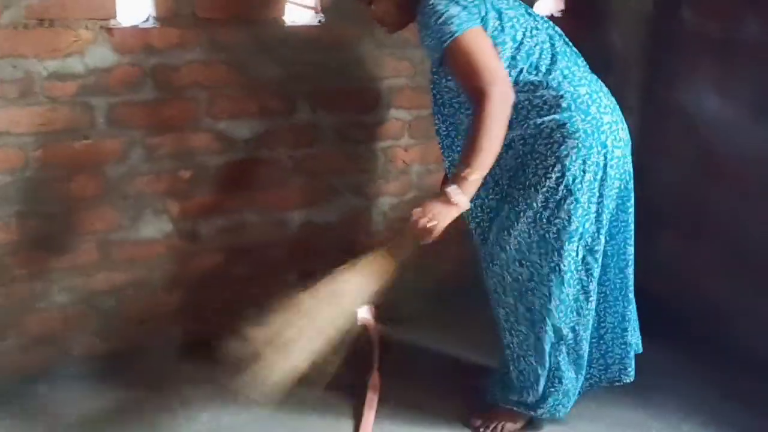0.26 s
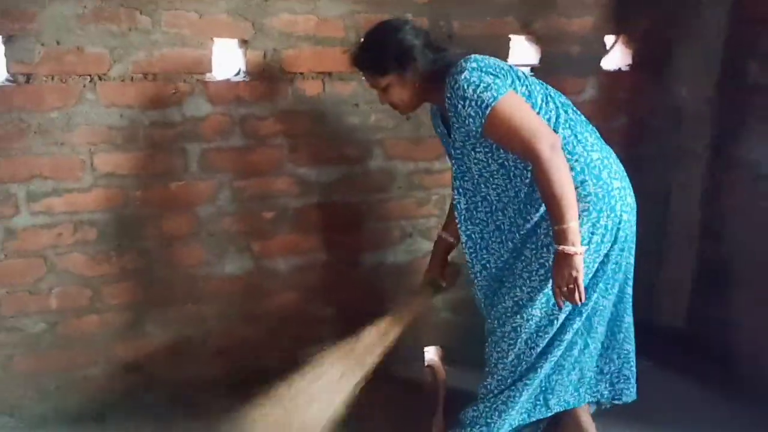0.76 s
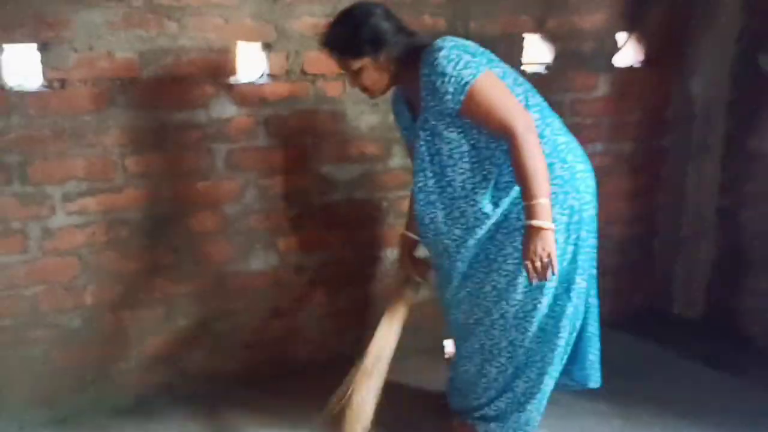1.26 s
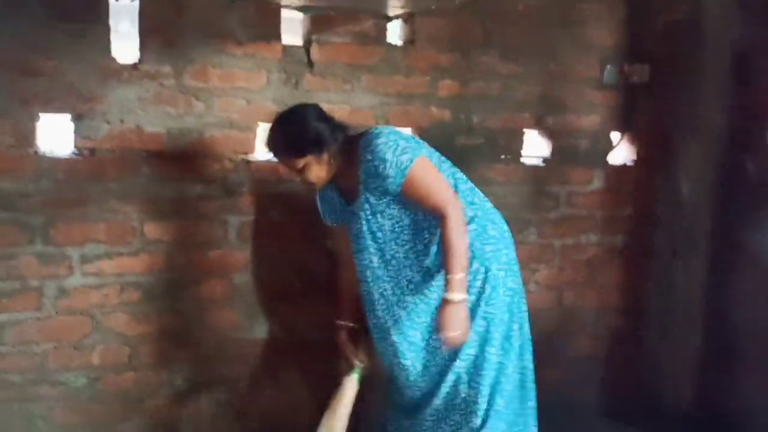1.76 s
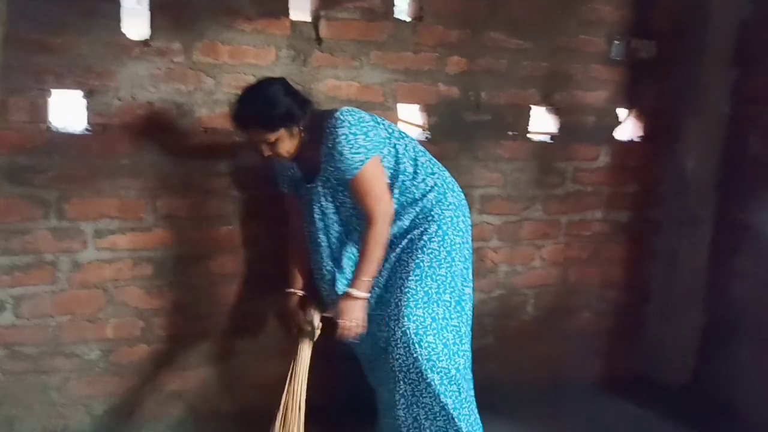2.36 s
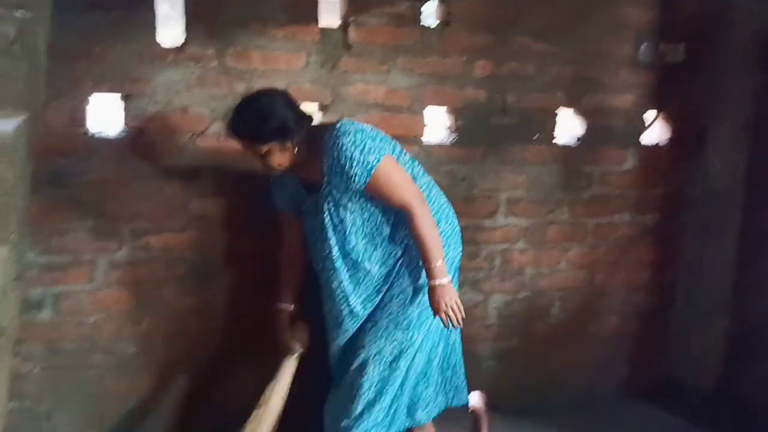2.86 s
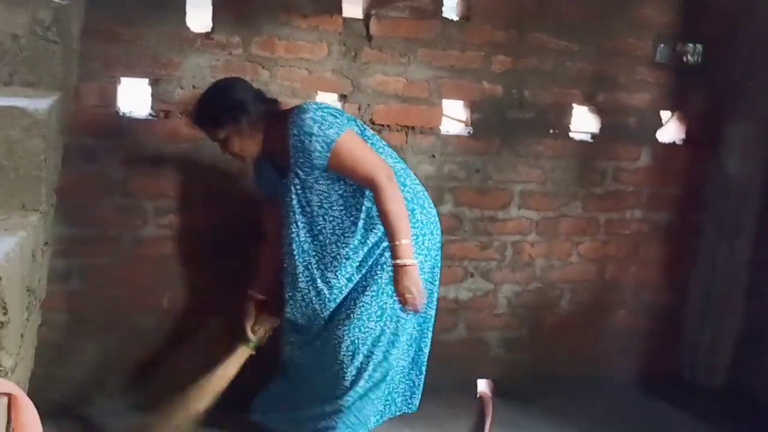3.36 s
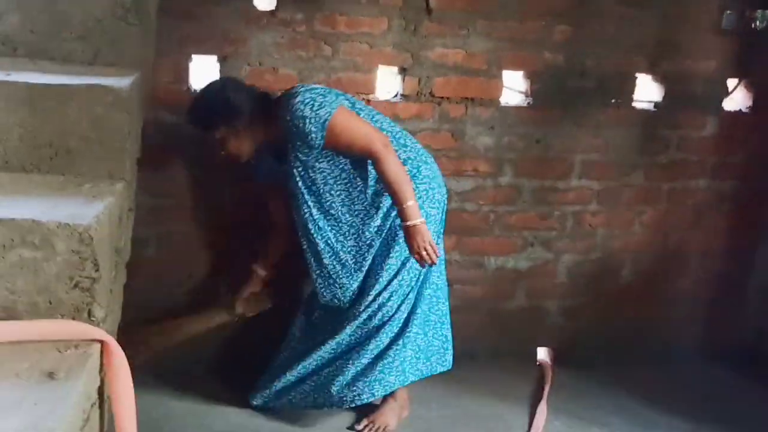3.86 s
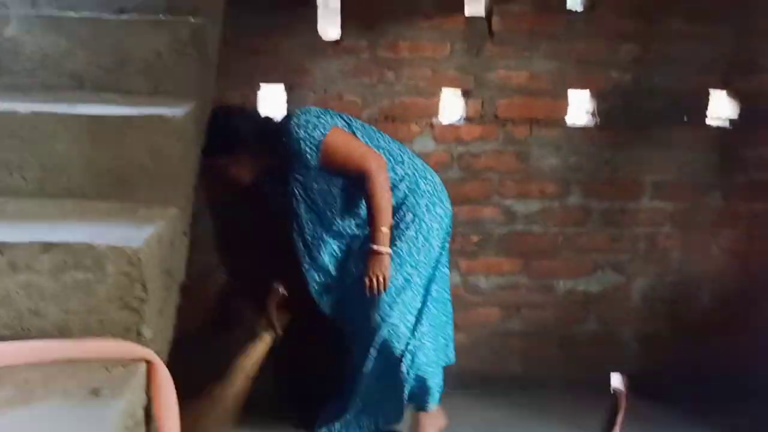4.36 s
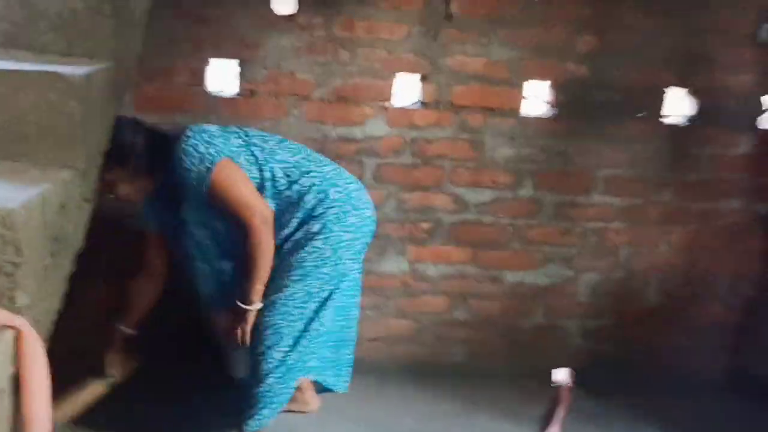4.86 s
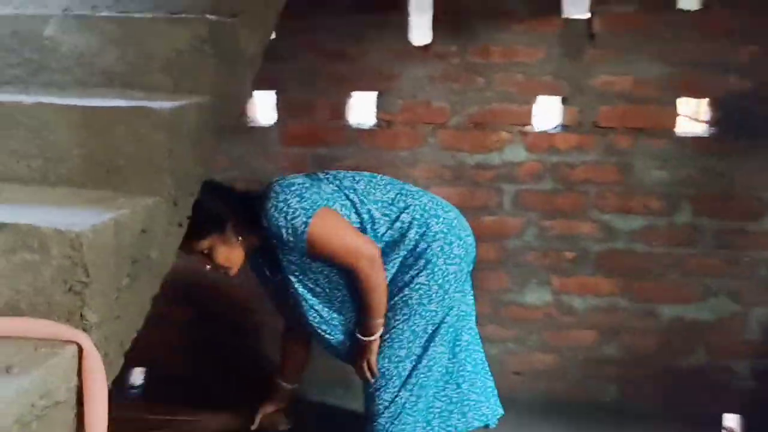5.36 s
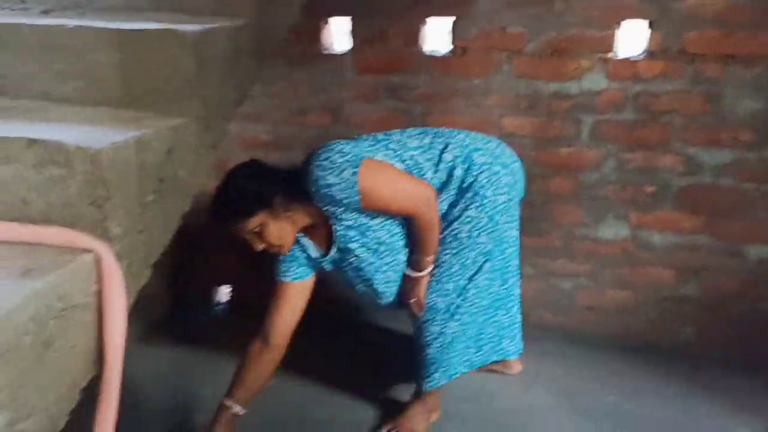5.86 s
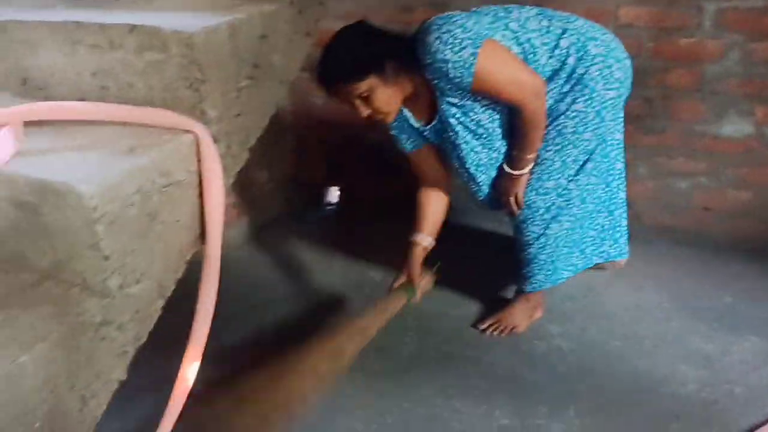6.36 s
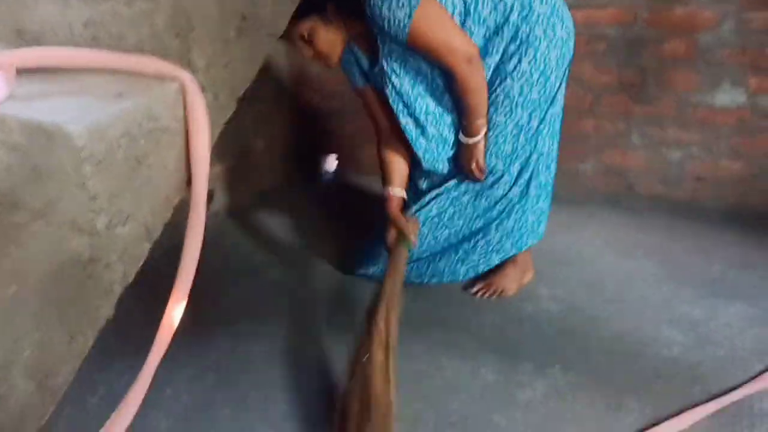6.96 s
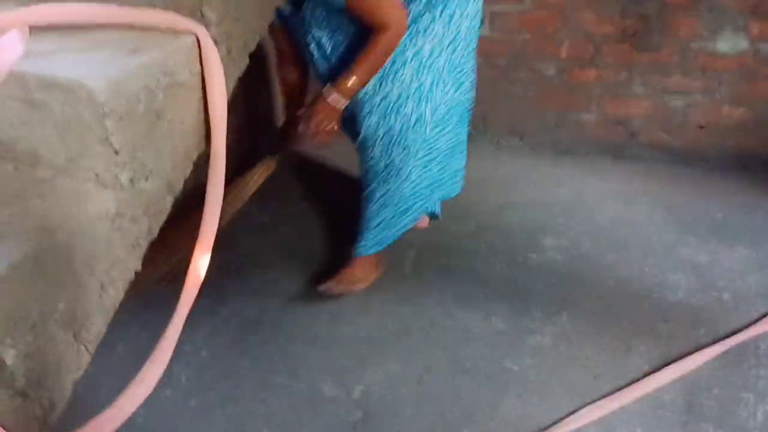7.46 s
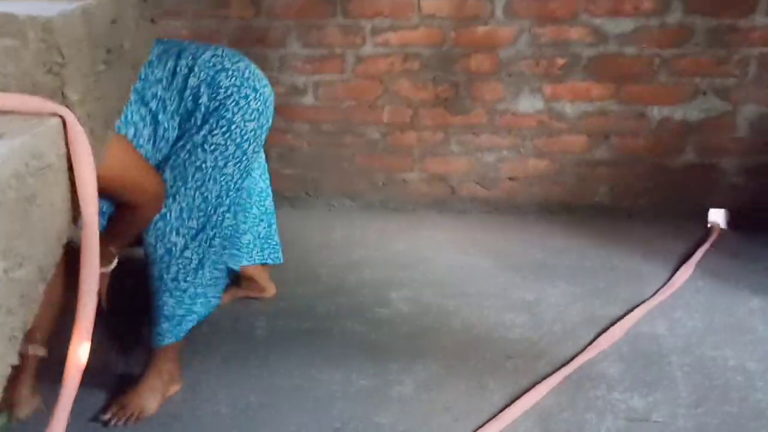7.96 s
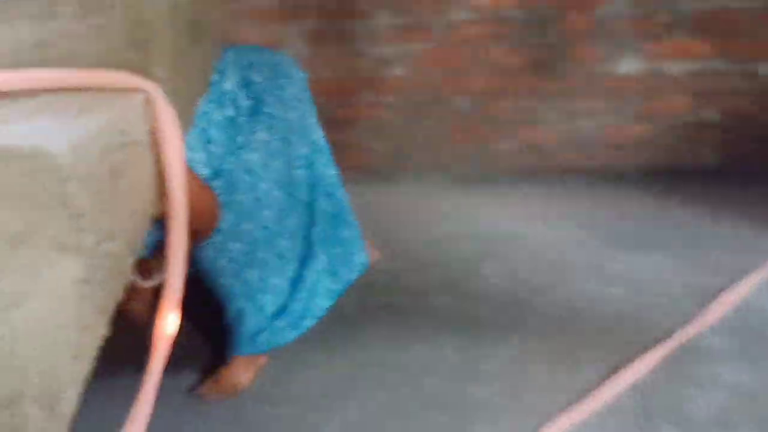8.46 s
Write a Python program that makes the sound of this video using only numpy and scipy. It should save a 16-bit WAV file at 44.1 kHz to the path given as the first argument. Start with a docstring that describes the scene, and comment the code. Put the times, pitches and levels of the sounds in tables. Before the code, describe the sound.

After a sharp knock, dry broom strokes rasp and hiss across a hard floor, faint birds chirping outside, bare feet padding later.

```python
"""In a bare brick room, a grass broom sweeps a gritty concrete floor from the open floor towards a stair.
Each stroke is a light touch-down, then a swish: random stick-slip impulses shaped into rasp and hiss,
over a low rustle of dull noise. Feet pad and scuff (damped pushes, filtered slips); bangles, squeaks,
groans and bird chirps are pitched tones. Noise makes a faint rumble outside; the hard walls answer
with a diffuse ring, shortest in the treble."""
import sys
import numpy as np
from scipy import signal
from scipy.fft import rfft, irfft, next_fast_len
from scipy.io import wavfile
from scipy.ndimage import uniform_filter1d, map_coordinates

SR = 44100
rng = np.random.default_rng(int(sys.argv[2]) if len(sys.argv) > 2 else 0)


def generate_wav(signal):
    """Clip the signal to [-1, 1] and save it as 16-bit WAV at the path in sys.argv[1]."""
    frames = np.transpose(np.atleast_2d(signal))
    scaled = np.clip(frames, -1, 1) * 32767
    pcm = np.round(scaled).astype(np.int16)
    wavfile.write(sys.argv[1], SR, pcm)


N = 384552
TIME = np.arange(N) / SR

# dull spectrum of the broom's bundle, bare feet and dress: freq_hz, level_db_per_hz
CLOTH_SPECTRUM = [(35, -35), (60, -3), (110, -0.5), (180, -0.5), (280, -0.5), (420, 0.5), (650, 0.5),
                  (850, -9), (1300, -7), (1700, -18), (2900, -90)]


def amp(db):
    """Decibels to gain."""
    return 10 ** (np.asarray(db) / 20)


def unit(x):
    """Scale to rms 1."""
    return x / np.sqrt(np.mean(x ** 2) + 1e-20)


def steady(x):
    """Scale to rms 1 over each quarter second."""
    power = np.abs(uniform_filter1d(x ** 2, SR // 4))
    return x / np.sqrt(power + 1e-12)


def along(points, hz):
    """Interpolate (freq_hz, value) points on a log frequency axis."""
    point_hz, value = np.transpose(points)
    return np.interp(np.log(hz + 1), np.log(point_hz + 1), value)


def curves(rows):
    """One value per sample for each column after the time."""
    time_s, *columns = np.transpose(rows)
    return [np.interp(TIME, time_s, column) for column in columns]


def wobble(rate_hz):
    """Smooth random curve, rate_hz knots a second."""
    knots = rng.standard_normal(int(N * rate_hz / SR) + 4)
    return map_coordinates(knots, [TIME * rate_hz])


def filtered(x, response):
    """Multiply the spectrum of x by a response of frequency."""
    n = len(x)
    padded = next_fast_len(n + 8192)
    freq_hz = np.fft.rfftfreq(padded, 1 / SR)
    return irfft(rfft(x, padded) * response(freq_hz), padded)[:n]


def low_pass(edge_hz):
    """Response that passes the part below edge_hz, with a steep skirt."""
    return lambda f: 1 / (1 + (f / edge_hz) ** 8)


def coloured(x, spectrum):
    """Weight x by the given spectrum, at rms 1."""
    return unit(filtered(x, lambda f: amp(along(spectrum, f))))


def resonance(f, mode_hz, width_hz):
    """Causal response of one damped mode."""
    damping = 1j * f * width_hz
    return damping / (mode_hz * mode_hz - f * f + damping)


def add(track, start_s, sound):
    """Mix a sound into the track at start_s."""
    part = track[max(round(start_s * SR), 0):][:len(sound)]
    part += sound[:len(part)]


def catches(rate_hz, spread_db):
    """Random stick-slip impulses of either sign and uneven size, rate_hz a second on average."""
    hits = rng.random(N) < rate_hz / SR
    sign = np.sign(rng.standard_normal(N))
    return unit(hits * sign * amp(spread_db * rng.standard_normal(N)))


def glides(rows, waver):
    """Tones that swell, slide from one pitch to another and fade; waver bends the pitch."""
    out = np.zeros(N)
    for start_s, length_s, level_db, start_hz, end_hz in rows:
        u = np.clip((TIME - start_s) / length_s, 0, 1)
        pitch_hz = (start_hz + (end_hz - start_hz) * u) * (1 + waver)
        tone = np.sin(2 * np.pi * np.cumsum(pitch_hz) / SR)
        out += amp(level_db) * np.sin(np.pi * u) * tone
    return out


def background():
    """The faint rumble of the neighbourhood comes through the open walls."""
    # freq_hz, level_db_per_hz
    outside_spectrum = [(25, -24), (45, -1), (70, 1), (105, 5.5), (200, -0.5), (500, 0.5), (1060, -9.5),
                        (1800, -6), (3000, -13), (5400, -16.5), (7900, -31), (12000, -21), (15000, -28)]
    level_db = -50.5 + 0.9 * wobble(3.8)
    return amp(level_db) * coloured(rng.standard_normal(N), outside_spectrum)


def bird():
    """Short wavering whistles from outside."""
    # faint whistles: start_s, length_s, level_db, start_hz, end_hz
    chirps = [(1.98, 0.15, -43, 2630, 2600), (2.08, 0.2, -44, 3100, 3140), (3.2, 0.18, -43, 3040, 2920),
              (3.80, .12, -51.5, 4220, 4020), (3.82, 0.13, -36, 3080, 2940), (4.43, 0.086, -38, 3160, 3160),
              (4.585, .11, -49.5, 3800, 3700)]
    return glides(chirps, waver=0.0236 * wobble(300)) * amp(2.5 * wobble(70))


def room(x):
    """Diffuse ring of brick and concrete: each band stores energy and lets it go, the treble fastest."""
    # decay of the walls' ring: freq_hz, t60_s
    walls = [(120, 0.96), (500, 0.86), (3000, 0.54), (6000, 0.27), (12000, 0.1)]
    hop = 128
    freq_hz, _, bands = signal.stft(x, SR, nperseg=2 * hop)
    keep = amp(-60 * hop / SR / along(walls, freq_hz)) ** 2  # energy left after one hop
    energy = np.array([signal.lfilter([0, 1 - k], [1, -k], abs(band) ** 2) for k, band in zip(keep, bands)])
    scatter = signal.stft(rng.standard_normal(N), SR, nperseg=2 * hop)[2]
    ring = np.sqrt(energy) * scatter / np.std(scatter)
    return signal.istft(ring, SR, nperseg=2 * hop)[1][:N]


def groans():
    """Something rubs with a low, hoarse, unsteady tone."""
    # start_s, length_s, level_db, start_hz, end_hz
    groan_rows = [(4.05, 0.32, -40.5, 309.3, 362), (4.14, 0.22, -38.5, 412, 445),
                  (4.94, 0.125, -39.5, 295.4, 234)]
    return glides(groan_rows, waver=0.073 * wobble(150)) * amp(2.3 * wobble(80))


def bangles():
    """Bangles touch with a tiny high ring: a fast-decaying sine."""
    # start_s, level_db, pitch_hz
    clinks = [(0.466, -37, 9550), (7.229, -41, 9450), (7.237, -48, 9600), (8.683, -33.5, 13590)]
    t60_s, attack_s = 0.05, 0.001
    out, t = np.zeros(N), np.arange(SR // 8) / SR
    for start_s, level_db, pitch_hz in clinks:
        envelope = amp(level_db - 60 * t / t60_s) * (1 - np.exp(-t / attack_s))
        add(out, start_s, envelope * np.sin(2 * np.pi * pitch_hz * t))
    return out


def shuffle():
    """Bare feet and the dress rub dully between the steps."""
    # a foot shifts or the dress swings: start_s, length_s, level_db
    shifts = [(.75, 1, -51.5), (1.611, .13, -41.5), (4.672, 0.11, -43.5), (4.974, 0.53, -47.5),
              (5.453, 0.61, -48), (6.25, .3, -60), (7.17, 0.063, -42.5), (7.219, 0.27, -38),
              (7.63, 0.14, -38.5), (7.783, .06, -37), (8.168, 0.16, -44.5), (8.39, 0.16, -39),
              (8.574, 0.15, -45)]
    skew, roundness = 0.61, 0.47  # under 1: a shift peaks early, and holds its level
    level = np.zeros(N)
    for start_s, length_s, level_db in shifts:
        u = np.linspace(0, 1, round(length_s * SR))
        add(level, start_s, amp(level_db) * np.abs(np.sin(np.pi * u ** skew)) ** roundness)
    rub = coloured(catches(rate_hz=1500, spread_db=1.5), CLOTH_SPECTRUM)
    return level * amp(1.3 * wobble(25)) * rub


def scuff():
    """A sole judders over the concrete in quick slips, which excite its modes."""
    # drag level: time_s, level_db
    drag = [(7.21, -55), (7.26, -40), (7.263, -26.5), (7.288, -31), (7.31, -36), (7.35, -39), (7.42, -53)]
    # modes of the sole: mode_hz, width_hz, gain_db
    sole_modes = [(271, 38, 4), (624, 380, -8.5), (1130, 510, -4.5), (1550, 140, 0), (1990, 200, -0.5)]

    def sole(f):
        """Sum of the sole's modes, in alternating sign."""
        return sum((-1) ** k * amp(gain_db) * resonance(f, mode_hz, width_hz)
                   for k, (mode_hz, width_hz, gain_db) in enumerate(sole_modes))

    level_db, = curves(drag)
    dragging = (TIME > drag[0][0]) * (TIME < drag[-1][0])
    rub = filtered(catches(rate_hz=1400, spread_db=0.5), sole)
    return amp(level_db) * dragging * unit(filtered(rub, low_pass(2150)))


def thumps():
    """A soft contact is one low push, about a cycle long, with a dull puff after it."""
    # footfalls and bumps: start_s, level_db, pitch_hz, t60_s (of the puff)
    contacts = [(1.635, -33, 150, .09), (5.345, -28, 330, 0.087), (6.121, -19.5, 302.2, 0.017),
                (6.125, -27, 90, .06), (7.195, -19.5, 520, 0.011), (7.423, -22, 300, 0.12),
                (7.436, -22.5, 169, .05), (7.66, -34, 300, 0.12), (7.692, -25.5, 150, .1),
                (7.801, -23.5, 420, 0.059), (7.816, -29, 210, 0.06), (8.2, -23, 620, 0.36),
                (8.448, -21.5, 300, 0.093), (8.451, -32, 100, .08), (8.498, -29, 400, .07)]
    out, t = np.zeros(N), np.arange(SR // 4) / SR
    for start_s, level_db, pitch_hz, t60_s in contacts:
        push = np.sin(2 * np.pi * pitch_hz * t) * np.exp(-(pitch_hz * t / 0.87) ** 2)
        noise = rng.standard_normal(len(t))
        puff = unit(filtered(noise, lambda f: (resonance(f, pitch_hz, 1.5 * pitch_hz)
                                               * resonance(f, pitch_hz, 5 * pitch_hz))))
        add(out, start_s, amp(level_db) * (push + 0.3 * puff * amp(-60 * t / t60_s)))
    return out


def knocks():
    """A hard blow on the floor and its bounces: each a sharp push and a short crack."""
    # start_s, level_db (before the push and crack weights)
    blows = [(0.019, -12.5), (0.0242, -14), (0.036, -14)]
    # crack spectrum: freq_hz, level_db_per_hz
    crack_spectrum = [(80, -30), (200, -2), (330, 6.5), (600, -5), (900, -12), (1300, -3), (1900, -7),
                      (3000, -6.5), (6000, -16), (10000, -37)]
    push_hz, crack_t60_s = 520, 0.082
    out, t = np.zeros(N), np.arange(SR // 4) / SR
    for start_s, level_db in blows:
        crack = coloured(rng.standard_normal(len(t)), crack_spectrum) * amp(-60 * t / crack_t60_s)
        push = np.cos(2 * np.pi * push_hz * t) * np.exp(-(push_hz * t / 0.88) ** 2)
        add(out, start_s, amp(level_db) * (0.47 * crack + 0.67 * push))
    return out


def squeaks():
    """Stiff stalks chatter briefly on the floor at a rough pitch."""
    # start_s, length_s, level_db, start_hz, end_hz
    chatters = [(3.365, 0.063, -38, 1460, 1590), (3.70, 0.096, -41, 2470, 2870),
                (3.965, 0.092, -34, 1660, 1836), (4.48, 0.25, -51.5, 3180, 2810),
                (5.67, 0.094, -35, 1927, 1944)]
    return glides(chatters, waver=0.065 * wobble(500)) * amp(2.5 * wobble(200))


def patchy(x, depth_db):
    """Narrow resonances come and go as different stalks touch the floor."""
    bands = signal.stft(x, nperseg=1024)[2]
    field = rng.standard_normal(bands.shape)
    field = uniform_filter1d(field, size=4, axis=0)  # smooth over frequency
    field = uniform_filter1d(field, size=9, axis=1)  # and over time
    return signal.istft(bands * amp(depth_db * unit(field)), nperseg=1024)[1][:N]


def swing(start_s, touch_db, peak_after_s, rise_s, fall_s):
    """Strength of one stroke, about 1 at its height: a light touch-down, then the swell of the push."""
    touch_s = 0.061  # the stalks settle on the floor in this time
    steepness = 2.6  # of the swell and fall outside their widths
    t = np.maximum(TIME - start_s, 0)
    landing = t / touch_s
    touch = amp(touch_db) * landing * np.exp(1 - landing)
    width_s = np.where(t < peak_after_s, rise_s, fall_s)
    swish = np.minimum(landing, 1) / (1 + np.abs((t - peak_after_s) / width_s) ** steepness)
    return np.hypot(touch, swish)


def sweeping():
    """Gains of rasp, hiss and low rustle; strokes and flicks add in power."""
    # start_s, touch_db (against swish), peak_after_s, swish_db, rise_s, fall_s (widths),
    # tips_db (hiss against swish), rustle_db
    strokes = [(-0.151, -10, 0.058, -25.5, 0.09, 0.141, -3.5, -52),
               (0.467, -7.5, 0.18, -22, 0.043, 0.12, -3.0, -46.5),
               (1.002, -6, 0.17, -23.0, 0.046, 0.13, -4, -47),
               (1.584, -6.5, 0.19, -23.5, 0.072, 0.12, -4.0, -48),
               (2.175, -13.5, 0.22, -23.5, 0.09, 0.1, -5.0, -52),
               (2.645, -3.5, 0.11, -39.0, 0.048, 0.055, -9, -69),
               (2.769, -5.5, 0.18, -24.0, 0.052, 0.14, -5.0, -49),
               (3.33, -12.5, 0.2, -25.5, 0.061, 0.11, -6.5, -49.5),
               (3.813, 3, 0.085, -45.5, 0.036, 0.056, -15, -71),
               (3.95, -8.5, 0.26, -28.0, 0.15, 0.12, -7, -48),
               (4.652, -11, 0.32, -29.0, 0.19, 0.15, -5.0, -47.5),
               (5.425, -11, 0.27, -29.0, 0.068, 0.148, -1, -44.5),
               (5.9, -17, 0.29, -30.5, 0.27, 0.11, -1, -47.5),
               (6.612, -12, 0.24, -26.0, 0.084, 0.13, -2.5, -46),
               (7.169, -7.5, 0.24, -39.5, 0.057, 0.29, -5.5, -52),
               (7.593, 1, 0.16, -37.5, 0.092, 0.62, -5.5, -53),
               (7.981, -8, 0.346, -33, 0.264, 0.36, -4.5, -48)]
    # bent stalks spring free: start_s, level_db
    flicks = [(.843, -26), (2.058, -42), (8.271, -30.5), (8.675, -40)]
    hiss_growth = 1.274  # dB of tip hiss for each dB of effort
    flick_rise_s, flick_fade_db_per_s, flick_hiss_db = 0.006, 158, -5  # hiss is against the flick's rasp
    rasp, hiss, rustle = np.zeros((3, N))
    for start_s, touch_db, peak_after_s, swish_db, rise_s, fall_s, tips_db, rustle_db in strokes:
        effort = swing(start_s, touch_db, peak_after_s, rise_s, fall_s)
        rasp += (amp(swish_db) * effort) ** 2
        hiss += (amp(swish_db + tips_db) * effort ** hiss_growth) ** 2
        rustle += (amp(rustle_db) * effort) ** 2
    for start_s, level_db in flicks:
        t = np.maximum(TIME - start_s, 0)
        flick = np.minimum(t / flick_rise_s, 1) * amp(level_db - flick_fade_db_per_s * t)
        rasp += flick ** 2
        hiss += (amp(flick_hiss_db) * flick) ** 2
    return np.sqrt([rasp, hiss, rustle])


def broom():
    """Stalks rasp and fine tips hiss over grit; they catch in bunches, and the colour follows the place."""
    # broom colour from place to place, each: freq_hz, level_db_per_hz
    open_floor = [(470, -33), (800, -14.5), (1130, -18.5), (1540, -8.5), (2210, -5), (2410, -4.5),
                  (3130, -0.5), (4010, 0.5), (4600, -3), (6110, -5), (7840, -12), (10000, -14), (11800, -9),
                  (13000, -7.5), (15500, -14.5)]
    mid_room = [(470, -37), (800, -11.5), (1050, -21), (1200, -10.5), (1510, -10), (1770, -2), (2240, -3.5),
                (3090, 1), (4010, -3), (4480, -9), (5340, -3), (8650, -18), (9920, -16), (13400, -9.5),
                (15500, -19)]
    by_wall = [(470, -42.5), (800, -11.5), (1000, -14.5), (1270, -11.5), (1790, -1.5), (2050, -1.5),
               (2350, -7.5), (2870, 2), (4220, -9), (5270, -7.5), (7640, -19), (10400, -18.5), (11500, -13),
               (13200, -16), (15500, -20.5)]
    low_reach = [(470, -29), (800, -12.5), (906, -7.5), (988, -8.5), (1190, -6.5), (1560, -5.5),
                 (1910, -0.5), (2300, -7.5), (2630, -3.5), (5080, -1.5), (7550, -11.5), (8760, -11),
                 (11800, -2), (13900, -3.5), (15500, -8.5)]
    by_stair = [(500, -22), (900, -12), (1300, -9.5), (1850, -1), (2300, -5), (2800, -.5), (3300, -4),
                (4200, -6), (5300, -3), (6400, -10), (7700, -16), (9700, -15), (12800, -6), (15500, -15.5)]
    # path of the broom: time_s, place (index into colours, fractions blend)
    path = [(1.8, 0), (2.4, 0.5), (3.5, 1), (3.9, 2), (4.4, 2), (4.8, 1.55), (5.1, 1.8), (5.6, 3), (6.4, 3),
            (6.65, 4)]
    colours = [open_floor, mid_room, by_wall, low_reach, by_stair]
    rasp_gain, hiss_gain, rustle_gain = sweeping()
    place, = curves(path)
    grit = patchy(catches(rate_hz=16000, spread_db=3.0), depth_db=1.34)
    grit = grit * amp(0.45 * wobble(140) + 0.21 * wobble(30))
    friction = np.zeros(N)
    for k, colour in enumerate(colours):
        nearness = np.clip(1 - abs(place - k), 0, 1)
        friction += nearness * coloured(grit, colour)
    rasp = filtered(friction, low_pass(6800))
    hiss = friction - rasp
    # the bundle itself rustles low as it is pushed
    bundle = coloured(rng.standard_normal(N), CLOTH_SPECTRUM)
    return amp(-0.42) * rasp_gain * steady(rasp) + amp(0.74) * hiss_gain * steady(hiss) + rustle_gain * bundle


def scene():
    """The sweeping is across the room; the soft steps are close and drier."""
    far = broom() + knocks() + squeaks()
    near = shuffle() + thumps() + scuff() + groans() + bangles()
    ring = room(amp(-3) * far + amp(-8) * near)
    mono = far + near + ring + bird() + background()
    return np.array([mono, mono])


def record(dry):
    """One microphone feeds both channels, with no deep bass and nothing above its band limit."""
    bass_hz, top_hz = 45, 15550
    mono = filtered(dry[0], lambda f: (f < top_hz) * (1 - 1 / (1 + (f / bass_hz) ** 4)))
    return np.array([mono, mono])


dry = scene()
out = record(dry)
generate_wav(out)
```